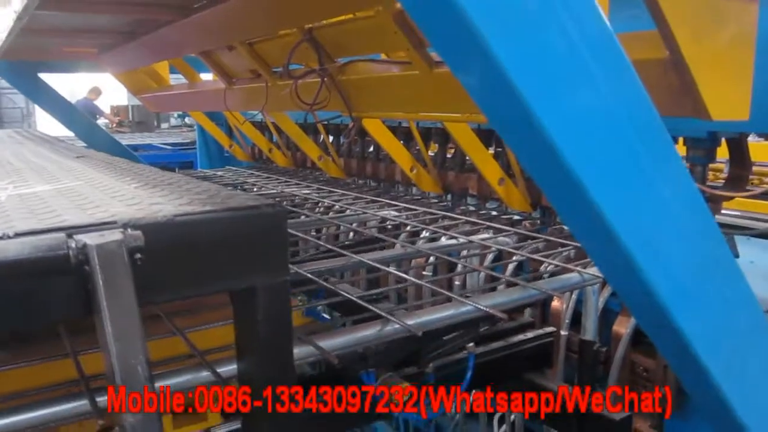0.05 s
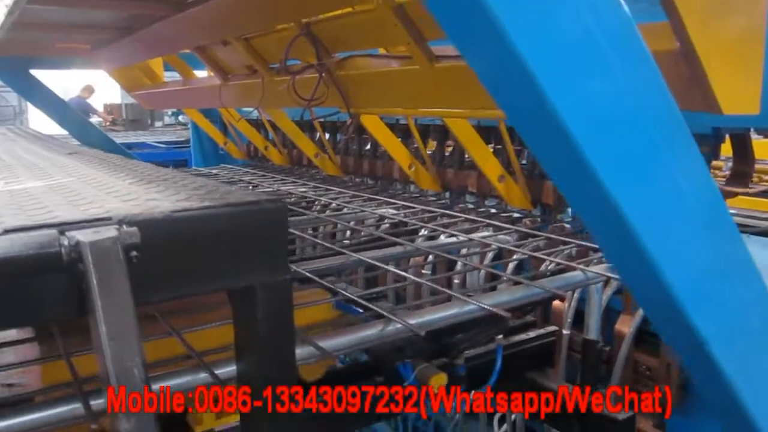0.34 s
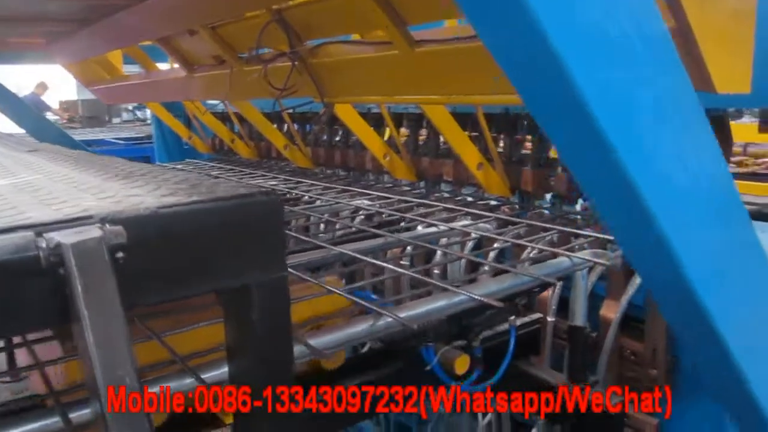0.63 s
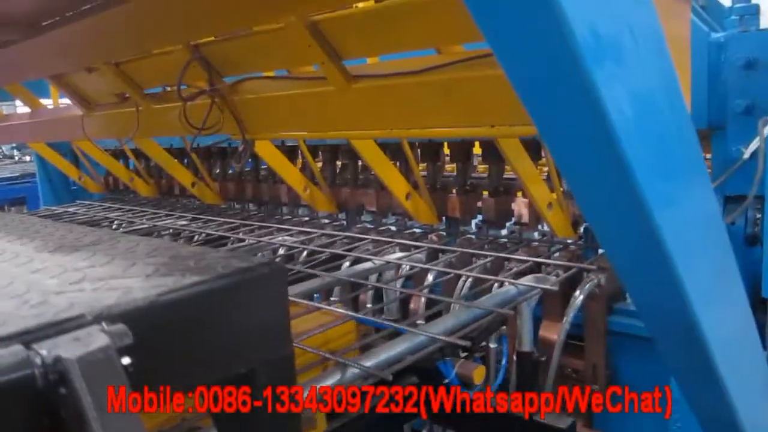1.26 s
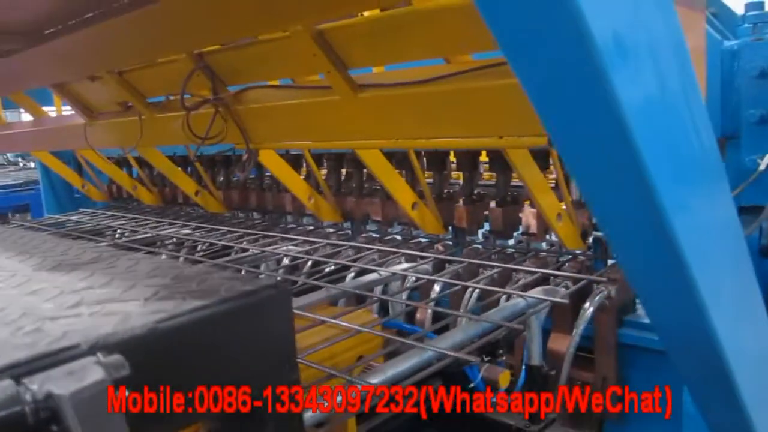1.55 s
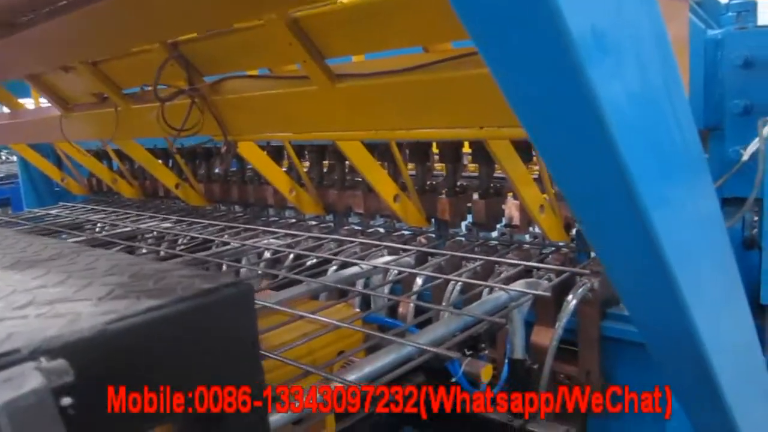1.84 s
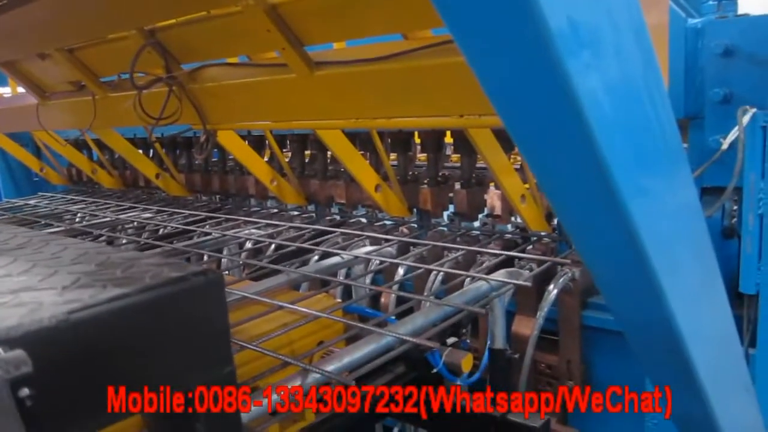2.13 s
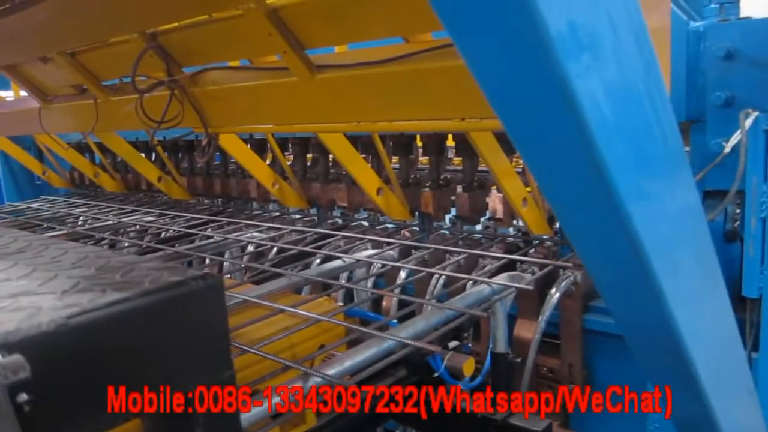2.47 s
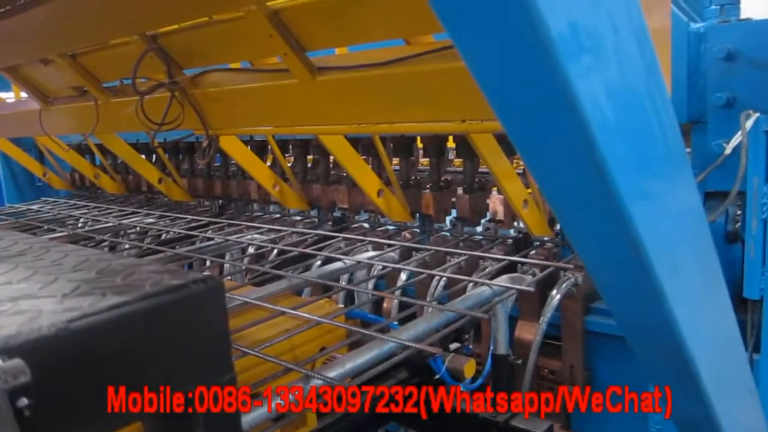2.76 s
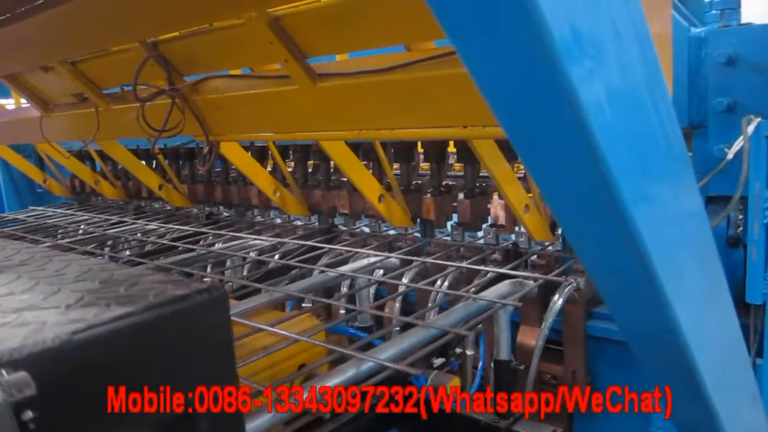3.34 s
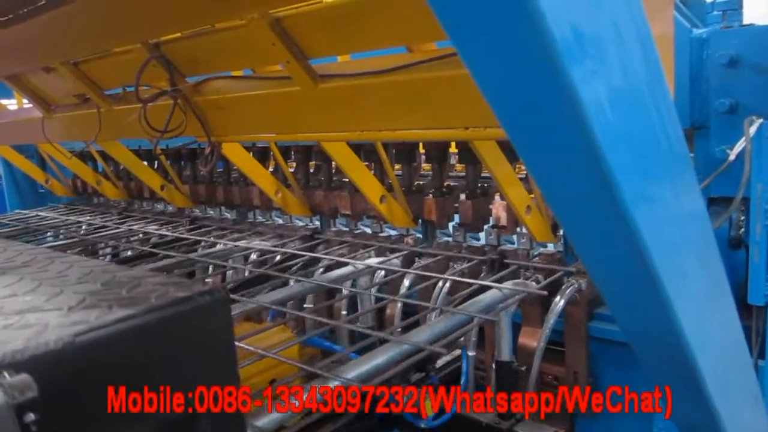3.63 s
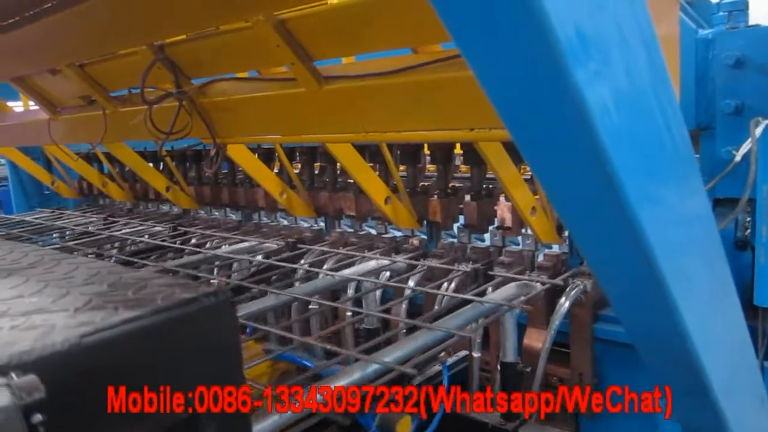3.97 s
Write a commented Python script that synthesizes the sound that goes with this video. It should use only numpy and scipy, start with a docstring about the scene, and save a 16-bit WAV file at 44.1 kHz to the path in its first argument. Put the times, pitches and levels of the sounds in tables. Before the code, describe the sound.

A wire mesh welding machine rumbles and rattles in a reverberant workshop. Steel clanks ring out and air hisses sharply twice, the second burst followed by the loudest crash. Near the end, mesh scrapes forward.

```python
"""A reverberant workshop with a steel mesh welding machine running.
Steel parts clank and ring the frame and mesh. Twice an air valve ticks and exhausts as the cylinder
thuds; near the end the mesh is dragged forward. Underneath, wires and rollers rattle, the drive rumbles
and wires hiss in their guides. A gain control ducks under the loud peaks and creeps back."""
import sys
import numpy as np
from scipy import signal
from scipy.fft import rfft, irfft, next_fast_len
from scipy.io import wavfile
from scipy.ndimage import map_coordinates

SR = 44100
rng = np.random.default_rng(int(sys.argv[2]) if len(sys.argv) > 2 else 0)


def waveform_to_disk(signal):
    """Save audio, clipped to [-1, 1], as 16-bit WAV at the path in sys.argv[1]."""
    frames = np.transpose(np.atleast_2d(signal))
    scaled = np.clip(frames, -1, 1) * 32767
    samples = np.round(scaled).astype(np.int16)
    wavfile.write(sys.argv[1], SR, samples)


N = 176400
TIME_S = np.arange(N) / SR

# Levels within spectra, modes and peaks are relative.
# steel blows: t/s, knock/dB, clank/dB, crack/dB, clank t60/s, mesh shake/dB
BLOWS = [(0.766, -26, -28.5, -45, 0.12, -40), (1.352, -16, -12.5, -30, 0.14, -21),
         (1.999, -15.5, -16.5, -33, 0.11, -39), (2.015, -14, -21, -45, 0.11, -37),
         (2.434, -28, -12, -5, 0.055, -35), (2.586, -22, -8, 4.5, 0.085, -16.5),
         (2.597, -21, -15, -4, 0.32, -17), (2.614, -21, -14, -11.5, 0.67, -21),
         (2.665, -35, -26, -30, 0.2, -21), (2.985, -32, -30, -31, 0.25, -32),
         (3.162, -27, -19, -28, 0.33, -22.5), (3.457, -27, -48, -22.5, 0.25, -33),
         (3.545, -40, -35, -18, 0.17, -33), (3.599, -33, -30, -36, 0.13, -18.5)]
# ringing of housing, frame, wire mesh and bed: f/Hz, level/dB, t60/s
HOUSING_MODES = [(222.3, 0, 0.15), (410, -2, 0.11), (526, -2, 0.14), (1570, -5, .17)]
FRAME_MODES = [(386, -5.5, 0.38), (536, 3, 0.14), (804, -7.5, 0.29), (901, -6.5, 0.71), (1090, 8, 0.24),
               (1336, 7, 0.31), (1543, 8, 0.21), (2097, -1.5, .5), (2307, 11, 0.18), (2715, 8, 0.19),
               (3085, 6.5, 0.12), (3970, 2, 0.25)]
MESH_MODES = [(679, 4, 0.24), (887, 6, 0.47), (1027, 4.5, 0.32), (1097, 6, 0.58), (1190, -4, 0.49),
              (1343, 0, 0.75), (1450, 2, .4), (1503, 5, .35), (1577, 5.5, 0.39), (2120, 8.5, .25),
              (2240, 3, .2), (2400, 4, .23), (3590, 7, 0.19)]
BED_MODES = [(146.6, -5, 0.3), (217.6, 2.5, 0.21)]
# body and bright edge of a blow: f/Hz, level/dB
CLANK_SPECTRUM = [(100, -23), (300, -35), (600, 6.5), (1000, -1), (1350, 8.5), (1580, 5.5), (2000, 2.5),
                  (2300, 0.5), (4000, -5.5), (7000, -14.5), (14000, -37)]
CRACK_SPECTRUM = [(600, -28), (1800, -2), (2800, 8.5), (5000, 4.5), (7500, 6), (11000, 1.5), (15000, -12)]
# air blasts: t/s, hiss/dB, tick/dB, thud/dB, hold/s, port resonance/dB
BLASTS = [(1.422, -1.5, -15, -11, 0.022, -3), (2.421, 3.5, -13, -9, 0.016, -13)]
# exhaust air and cylinder thud: f/Hz, level/dB
AIR_SPECTRUM = [(300, -55), (1200, -9), (2000, -0.5), (3000, 2.5), (4500, 3.5), (6000, 6.5), (7500, 3),
                (11000, 3), (13000, 0.5), (15500, -10)]
THUD_SPECTRUM = [(25, -17), (70, 8), (130, 7), (300, -6), (1000, -9.5), (3000, -1), (8000, -40)]
# resonances of exhaust port and wire ends: f/Hz, width/Hz, level/dB
PORT_PEAKS = [(3050, 450, 1), (3550, 300, -4), (3920, 320, 2), (4460, 240, -2), (5300, 260, -1),
              (5810, 320, -1), (9380, 350, -2), (10120, 350, -3)]
WIRE_PEAKS = [(9400, 220, -6), (10700, 200, 4), (11800, 400, 0), (12550, 350, -5), (13600, 300, -8)]
# heavy parts hitting stops, wire ends snapping free: t/s, level/dB
THUMPS = [(.195, -13.5), (.76, -15), (1.35, -16), (2.06, -33), (2.595, -9)]
PINGS = [(.52, -33), (3.163, -21.5), (3.457, -24), (3.94, -38)]
# course of mesh drag and motor drone: t/s, level/dB
DRAG_LEVELS = [(3.15, -66), (3.18, -37), (3.45, -27.5), (3.54, -25), (3.61, -16.5), (3.67, -21), (4, -25)]
DRONE_LEVELS = [(0, 0), (.45, -1.5), (.8, -1), (1.05, 0.5), (1.28, 2.5), (1.7, -4.5), (2.1, -3),
                (2.4, -6.5), (2.68, 1), (2.88, -3.5), (3.03, 1), (3.3, -8), (4, -5.5)]
# running machine: t/s, rumble/dB, rattle/dB, scrape/dB
RUNNING_LEVELS = [(0, -19, -17, -24), (.2, -22, -19, -28), (.38, -21.5, -19, -29), (.49, -24, -22, -34),
                  (.53, -21.5, -20.5, -28), (.65, -22.5, -20.5, -29.5), (.8, -20.5, -19.5, -27.5),
                  (1.1, -25.5, -17, -23), (1.3, -26, -19, -27.5), (1.42, -18, -19, -28.5),
                  (1.55, -25, -20.5, -35), (1.8, -27, -23, -32), (1.97, -26.5, -26, -36.5),
                  (2.1, -28.5, -25, -34.5), (2.38, -32, -24, -34), (2.58, -25.5, -29, -51),
                  (2.92, -29, -30, -42), (3.02, -26, -24, -40), (3.15, -33, -23.5, -42),
                  (3.2, -29, -23, -39), (3.42, -28, -22, -34), (3.6, -26, -15.5, -21.5),
                  (3.7, -28.5, -21, -30), (4, -30.5, -23.5, -38)]
# noise of dragged mesh, rollers, drive and wire guides: f/Hz, level/dB
DRAG_SPECTRUM = [(250, -19), (650, -5), (920, 3), (1250, -3), (1700, -4.5), (2300, 1.5), (3500, -5),
                 (6000, -21), (10000, -49)]
RATTLE_SPECTRUM = [(100, -54), (250, -18), (400, 0), (600, 1.5), (900, 1), (1400, -0.5), (2000, -3),
                   (3000, -4.5), (4500, -9), (7000, -17), (10000, -34), (15000, -51)]
RUMBLE_SPECTRUM = [(20, -21), (50, -8), (85, -13.5), (115, -3), (165, -2), (215, -1), (270, -3.5),
                   (330, -6), (500, -18), (1500, -61)]
SCRAPE_SPECTRUM = [(1000, -5), (3000, -1), (5000, 7), (7500, 3), (11000, 0.5), (13000, -8.5), (14200, -17),
                   (15500, -57)]
# motor tones: f/Hz, width/Hz, level/dB
DRONE_LINES = [(141.6, 3, -29.5), (205, 4, -33.5), (217, 5, -30.5), (292.3, 4, -39.5), (360, 2.3, -42.5),
               (384, 4.6, -41.5)]
# workshop decay: f/Hz, t60/s
HALL_T60_S = [(100, 0.23), (500, 2), (1500, 1.36), (4000, 0.78), (8000, 0.7), (14000, 0.55)]
# stereo width: f/Hz, side over mid/dB
WIDTH_DB = [(60, -26), (130, -36), (250, -23), (500, -21), (1000, -10), (2000, -7.5), (4000, -3),
            (8000, -0.5), (13000, 0.5)]
# stereo balance: f/Hz, left over right/dB
BALANCE_DB = [(400, 0), (1200, -1), (2400, -.5), (4400, -0.5), (8000, 0.8), (13000, 0.5)]

BLOW_RISE_S = 0.0018


def steel_blows(crack_t60_ratio=0.63, frame_db=-7.5, hall_db=-10):
    """Steel strikes steel: a low knock, a crack and a clank that rings the frame."""
    knock = struck(BLOWS, HOUSING_MODES, rise_s=0.002)
    clank_env, crack_env = 0, 0
    for start_s, _, clank_db, crack_db, t60_s, _ in BLOWS:
        clank_env += amp(clank_db) * burst(start_s, BLOW_RISE_S, t60_s)
        crack_env += amp(crack_db) * burst(start_s, 0.00052, crack_t60_ratio * t60_s)
    impact = clank_env * noise(CLANK_SPECTRUM) + crack_env * noise(CRACK_SPECTRUM)
    frame = ring(clank_env * rng.standard_normal(N), FRAME_MODES)
    direct = knock + impact + amp(frame_db) * frame
    return direct + amp(hall_db) * hall(direct)


def mesh_ring(shake_t60_s=0.29):
    """Each blow shakes the wire mesh, which rings on."""
    shake_env = sum(amp(db) * burst(start_s, BLOW_RISE_S, shake_t60_s) for start_s, *_, db in BLOWS)
    return ring(shake_env * rng.standard_normal(N), MESH_MODES)


def air_blasts(valve_lag_s=0.013, hall_db=-4.5):
    """The valve ticks, the cylinder thuds; the exhaust holds, then dies with the falling pressure."""
    air, thud_env = 0, 0
    for start_s, hiss_db, tick_db, thud_db, hold_s, port_db in BLASTS:
        tick_env = amp(tick_db) * burst(start_s, rise_s=0.00064, t60_s=0.061)
        hiss_env = amp(hiss_db) * burst(start_s + valve_lag_s, rise_s=0.0087, t60_s=0.37, hold_s=hold_s)
        jet = unit(noise(AIR_SPECTRUM) + amp(port_db) * resonant_noise(PORT_PEAKS))
        air += (tick_env + hiss_env) * jet
        thud_env += amp(thud_db) * burst(start_s, rise_s=0.013, t60_s=0.18)
    return air + amp(hall_db) * hall(air) + thud_env * noise(THUD_SPECTRUM)


def bed_thumps():
    """Heavy parts reach their stops; the bed booms in two low modes."""
    return struck(THUMPS, BED_MODES, rise_s=0.012)


def mesh_drag(ring_db=-5):
    """The finished mesh grates and rings as it is pulled over its table."""
    grating = noise(DRAG_SPECTRUM)
    ringing = unit(ring(rng.standard_normal(N), MESH_MODES))
    return amp(over_time(DRAG_LEVELS)) * unit(grating + amp(ring_db) * ringing)


def wire_pings(t60_s=0.087):
    """Wire ends snap free and ring high in the treble."""
    envelope = sum(amp(db) * burst(start_s, BLOW_RISE_S, t60_s) for start_s, db in PINGS)
    return envelope * resonant_noise(WIRE_PEAKS)


def rattle(level_db, contacts_per_s=260, spread_db=3.5, contact_db=-9.5, frame_db=-12):
    """Small contacts of wires and rollers ring the frame and merge into a roar."""
    count = int(contacts_per_s * N / SR)
    when, strength, polarity = rng.random((count, 3)).T
    size_db = spread_db * np.minimum(-np.log(1 - strength), 4)
    hits = np.bincount((when * N).astype(int), amp(size_db) * np.sign(polarity - 0.5), N)
    contact_env = burst(0, rise_s=0.0001, t60_s=0.049)[:SR // 8]
    energy = signal.fftconvolve(hits ** 2, contact_env ** 2)[:N]
    contacts = unit(np.sqrt(np.abs(energy)) * noise(RATTLE_SPECTRUM))
    roar = noise(RATTLE_SPECTRUM) + amp(contact_db) * contacts
    frame = unit(ring(hits, FRAME_MODES))
    return amp(level_db + 0.4 * wobble(rate_hz=22.08)) * unit(roar + amp(frame_db) * frame)


def drive_rumble(level_db):
    """The drive rumbles with its load."""
    return amp(level_db + 0.7 * wobble(rate_hz=14)) * noise(RUMBLE_SPECTRUM)


def motor_drone(waver_db=1.5, jitter_rad=0.63):
    """The motor's tones waver slightly in level and phase."""
    drone = 0
    for hz, width_hz, db in DRONE_LINES:
        peak = np.sqrt(2) * amp(db + waver_db * wobble(rate_hz=9.3))
        drone += peak * np.sin(2 * np.pi * hz * TIME_S + jitter_rad * wobble(2 * width_hz))
    return amp(over_time(DRONE_LEVELS)) * drone


def wire_scrape(level_db):
    """Wires hiss as they slide through their guides."""
    return amp(level_db + 0.3 * wobble(rate_hz=18)) * noise(SCRAPE_SPECTRUM)


def hall(x, build_up_s=0.0093):
    """Workshop reverberation; the mids ring longest."""
    hz, t, frames = signal.stft(rng.standard_normal((2, SR)), SR, nperseg=256)
    decay = amp(-60 * t / over_freq(HALL_T60_S, hz)[:, None])
    tail = signal.istft(frames * decay, SR, nperseg=256)[1]
    tail_s = np.arange(tail.shape[1]) / SR
    tail *= 1 - np.exp(-(tail_s / build_up_s) ** 2)
    mid_side = np.array([x[0] + x[1], x[0] - x[1]]) / 2
    mid, side = signal.fftconvolve(mid_side, tail / np.linalg.norm(tail[0]), axes=1)[:, :N]
    return np.array([mid + side, mid - side])


def struck(hits, modes, rise_s):
    """Each hit sets the modes of a heavy part swinging."""
    sound = np.zeros(N)
    for start_s, hit_db, *_ in hits:
        for hz, mode_db, t60_s in modes:
            tone = np.sin(2 * np.pi * (hz * TIME_S + rng.random()))
            sound += amp(hit_db + mode_db) * burst(start_s, rise_s, t60_s) * tone
    return sound


def ring(force, modes):
    """Stereo response of a steel part's modes to a force."""
    t = np.arange(SR * 3 // 4) / SR
    response = 0
    for hz, db, t60_s in modes:
        phase_rad = rng.normal(0, 0.4, (2, 1))
        response += amp(db - 60 * t / t60_s) * np.sin(2 * np.pi * hz * t + phase_rad)
    return signal.fftconvolve(force[None], response / np.linalg.norm(response[0]), axes=1)[:, :N]


def burst(start_s, rise_s, t60_s, hold_s=0):
    """Envelope: rise, hold, decay."""
    envelope, first = np.zeros(N), int(start_s * SR)
    t = np.arange(min(int((hold_s + 1.5 * t60_s) * SR), N - first)) / SR
    decay = amp(-60 * np.maximum(t - hold_s, 0) / t60_s)
    envelope[first:first + len(t)] = (1 - np.exp(-t / rise_s)) * decay
    return envelope


def noise(spectrum):
    """Stereo noise with the given spectrum."""
    return stereo_noise(lambda hz: amp(over_freq(spectrum, hz)))


def resonant_noise(peaks):
    """Stereo noise in narrow resonances."""
    return stereo_noise(lambda hz: sum(
        amp(db) / np.sqrt(width_hz) / (1 + (2 * (hz - peak_hz) / width_hz) ** 2)
        for peak_hz, width_hz, db in peaks))


def stereo_noise(response):
    """Shaped noise of rms 1: bass central, treble wide."""
    width = lambda hz: np.array([np.ones_like(hz), amp(over_freq(WIDTH_DB, hz))])
    mid, side = filtered(rng.standard_normal((2, N)), lambda hz: response(hz) * width(hz))
    return unit(np.array([mid + side, mid - side]))


def filtered(x, response):
    """Zero-phase filter with gain response(hz)."""
    size = next_fast_len(N + SR // 2)
    return irfft(rfft(x, size) * response(np.fft.rfftfreq(size, 1 / SR)), size)[..., :N]


def wobble(rate_hz):
    """Smooth random curve with knots at rate_hz."""
    return map_coordinates(rng.standard_normal(N // 100), [TIME_S * rate_hz], mode="wrap")


def over_time(table, column=1):
    """One column, interpolated per sample."""
    columns = np.transpose(table)
    return np.interp(TIME_S, columns[0], columns[column])


def over_freq(table, hz):
    """Table interpolated on a log frequency axis."""
    knots_hz, values = np.transpose(table)
    return np.interp(np.log(hz + 1), np.log(knots_hz + 1), values)


def amp(db):
    """dB to gain."""
    return 10 ** (np.asarray(db) / 20)


def unit(x):
    """Scale to rms 1."""
    return x / np.sqrt(np.mean(x ** 2) + 1e-20)


def scene():
    """The whole machine; mids slightly right, top treble slightly left."""
    rumble_db, rattle_db, scrape_db = (over_time(RUNNING_LEVELS, column) for column in (1, 2, 3))
    running = motor_drone() + drive_rumble(rumble_db) + rattle(rattle_db) + wire_scrape(scrape_db)
    events = mesh_drag() + air_blasts() + wire_pings() + steel_blows() + mesh_ring() + bed_thumps()
    balance = lambda hz: amp(over_freq(BALANCE_DB, hz) * np.array([[0.5], [-0.5]]))
    return filtered(events + running, balance)


def smooth(x, tau_s):
    """One-pole low-pass."""
    pole = np.exp(-1 / (tau_s * SR))
    return signal.lfilter([1 - pole], [1, -pole], x)


def gain_control(x, threshold_db=-14, release_db_per_s=19, attack_s=0.0018, look_ahead_s=0.0017):
    """Gain drops fast above the threshold and recovers slowly."""
    power = smooth(np.mean(x ** 2, axis=0), tau_s=0.0098)
    over_db = np.maximum(10 * np.log10(power + 1e-12) - threshold_db, 0)
    release_db = release_db_per_s * TIME_S
    cut_db = smooth(np.maximum.accumulate(over_db + release_db) - release_db, attack_s)
    return x * amp(-np.interp(TIME_S + look_ahead_s, TIME_S, cut_db))


def record(dry):
    """Gain control, soft clipping, a narrow treble notch and a band limit."""
    ceiling, knee = 0.73, 2.6
    notch_hz, width_hz, skirt_hz, top_hz = 8245, 210, 373, 15750
    ducked = gain_control(dry)
    clipped = ducked / (1 + np.abs(ducked / ceiling) ** knee) ** (1 / knee)
    notch = lambda hz: (1 - np.exp(-((hz - notch_hz) / width_hz) ** 2)) ** 2
    skirt = lambda hz: 1 - 1 / (1 + ((hz - notch_hz) / skirt_hz) ** 2)
    return filtered(clipped, lambda hz: notch(hz) * skirt(hz) * (hz < top_hz))


dry = scene()
out = record(dry)
waveform_to_disk(out)
```